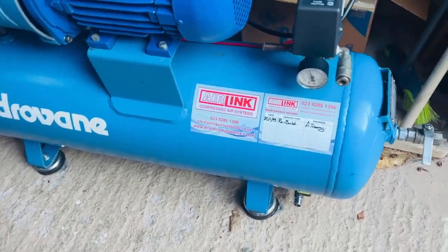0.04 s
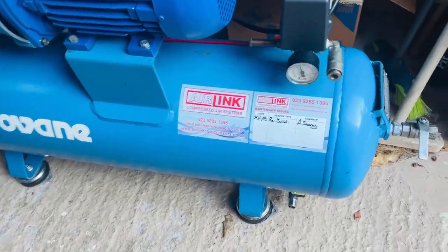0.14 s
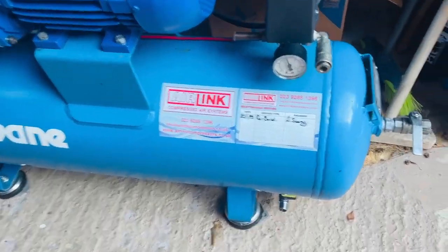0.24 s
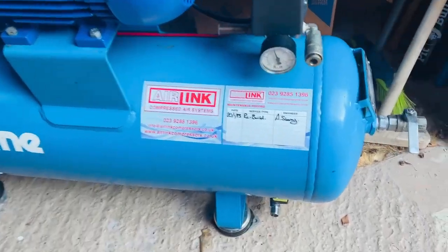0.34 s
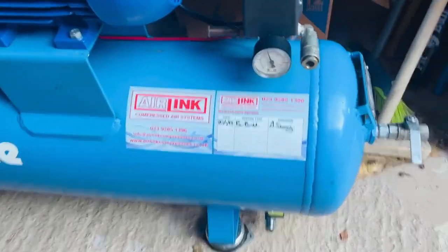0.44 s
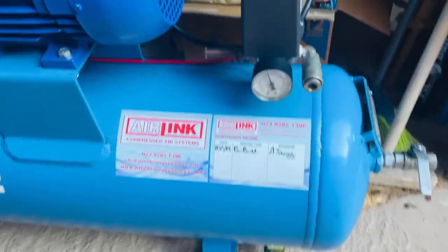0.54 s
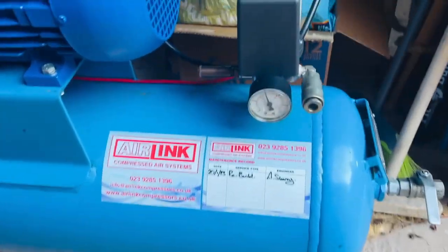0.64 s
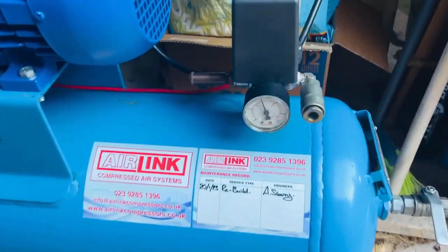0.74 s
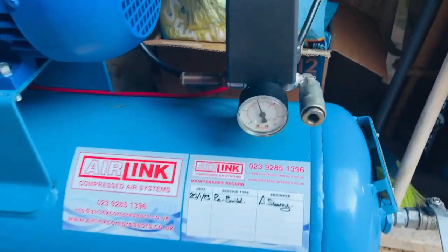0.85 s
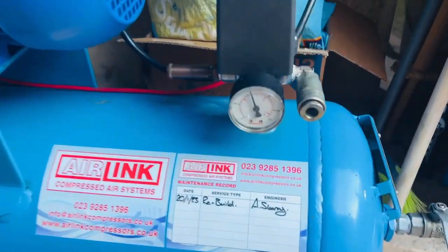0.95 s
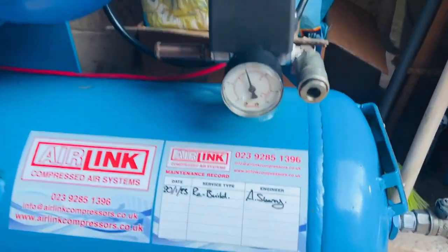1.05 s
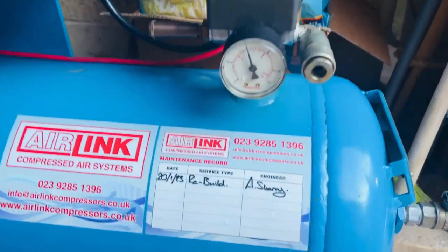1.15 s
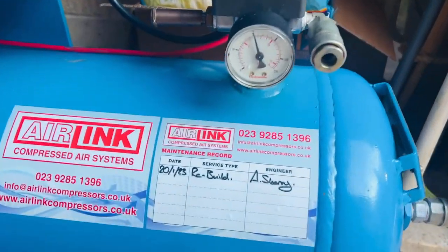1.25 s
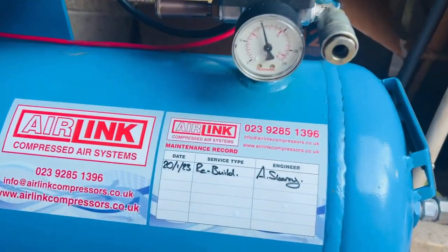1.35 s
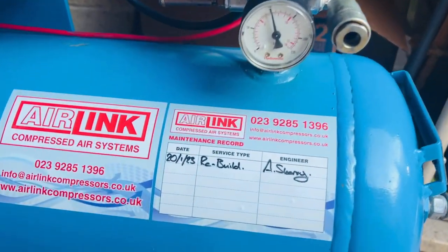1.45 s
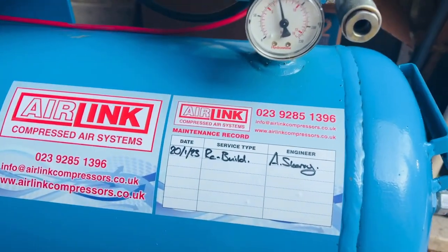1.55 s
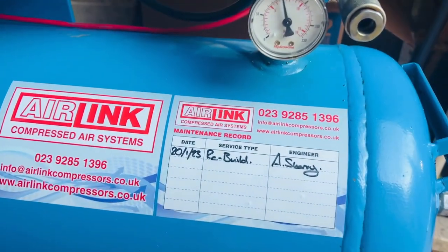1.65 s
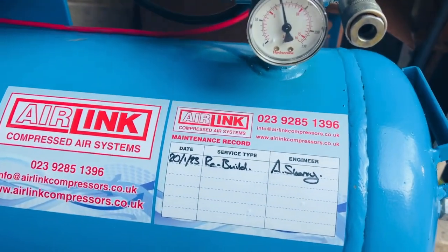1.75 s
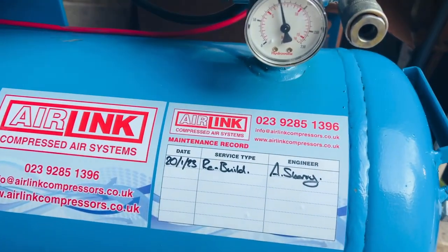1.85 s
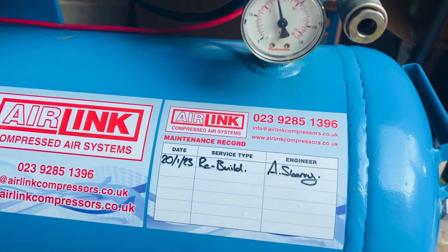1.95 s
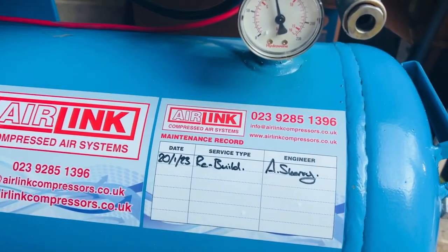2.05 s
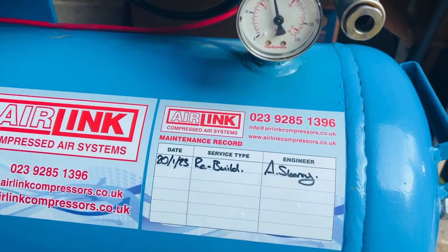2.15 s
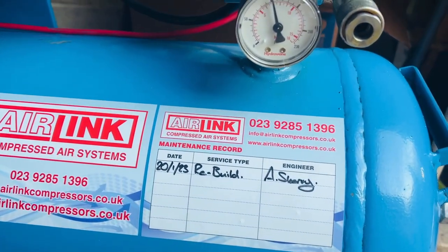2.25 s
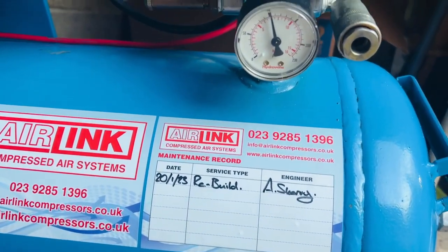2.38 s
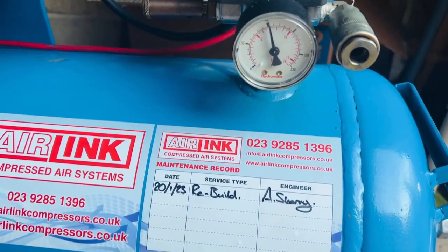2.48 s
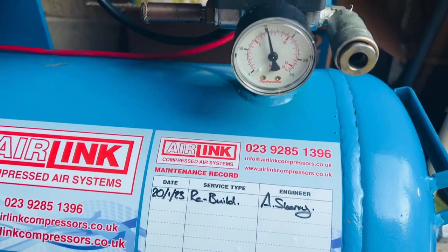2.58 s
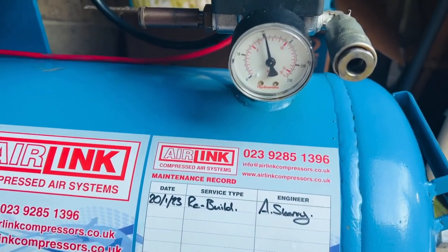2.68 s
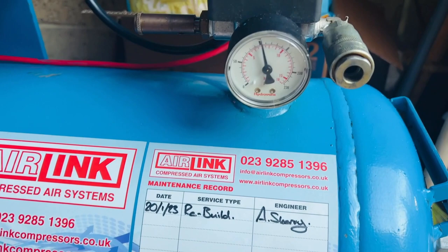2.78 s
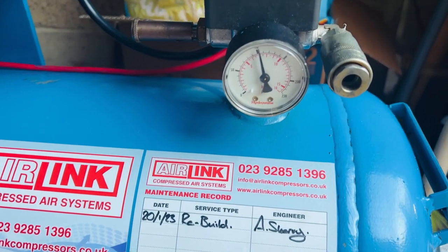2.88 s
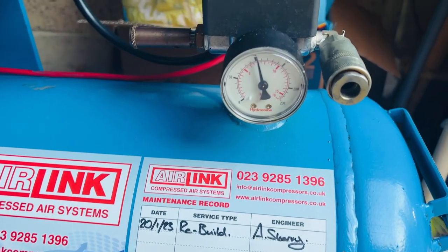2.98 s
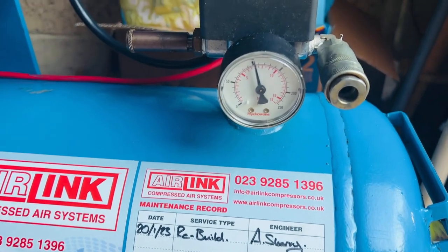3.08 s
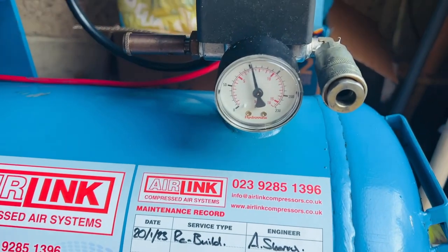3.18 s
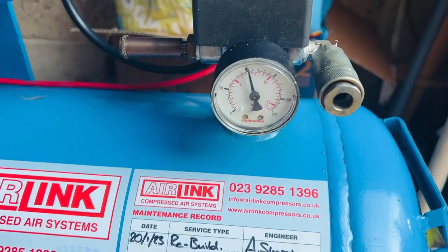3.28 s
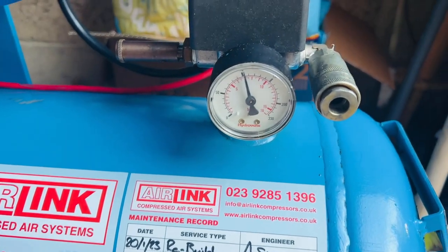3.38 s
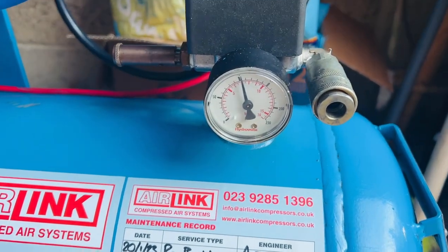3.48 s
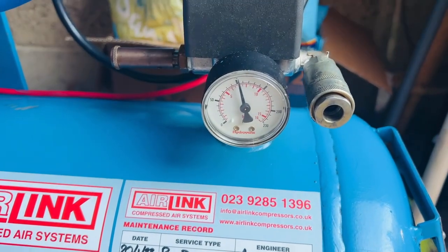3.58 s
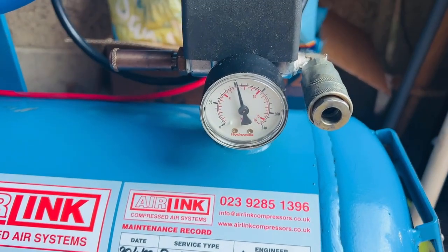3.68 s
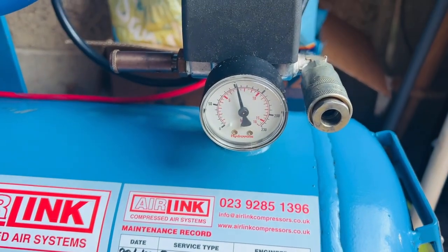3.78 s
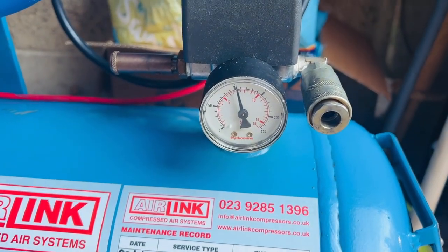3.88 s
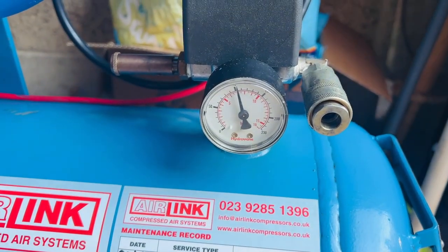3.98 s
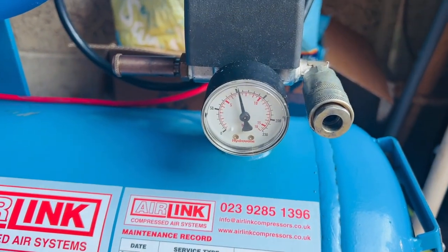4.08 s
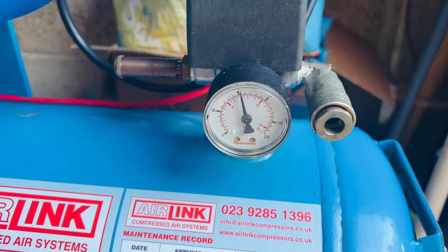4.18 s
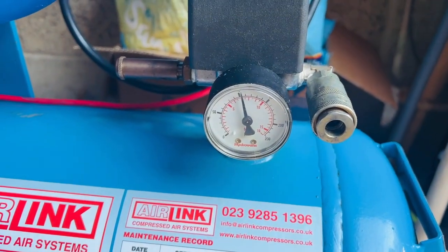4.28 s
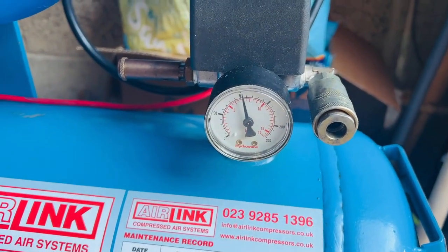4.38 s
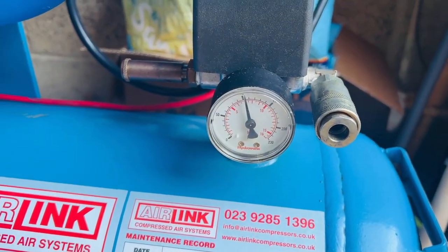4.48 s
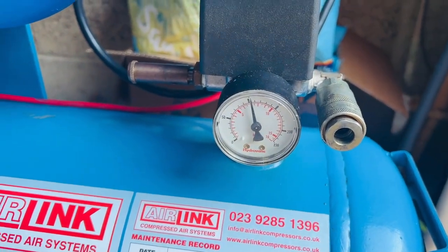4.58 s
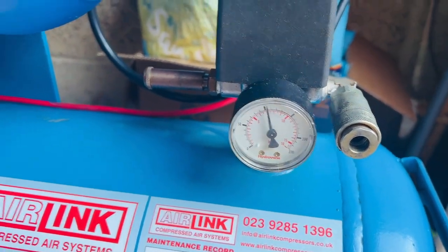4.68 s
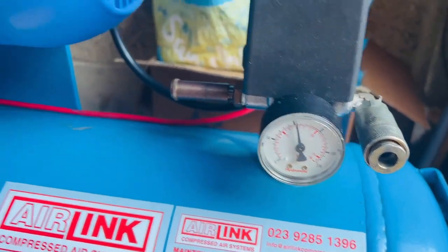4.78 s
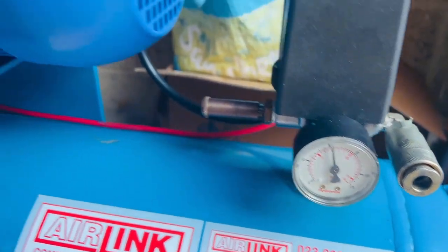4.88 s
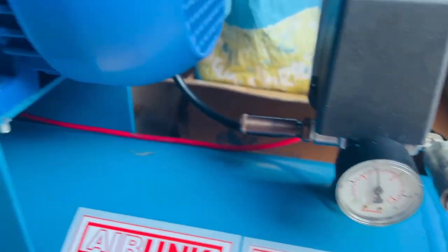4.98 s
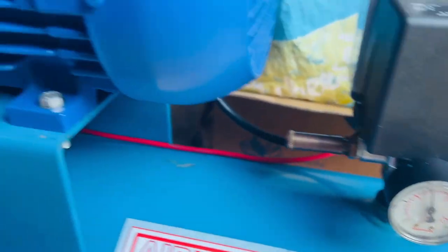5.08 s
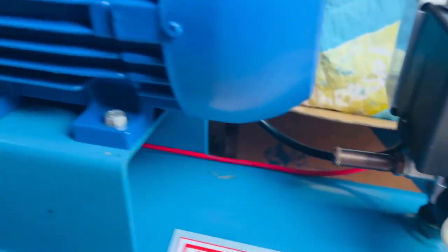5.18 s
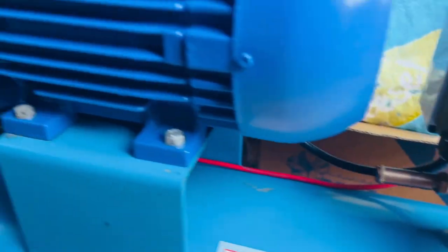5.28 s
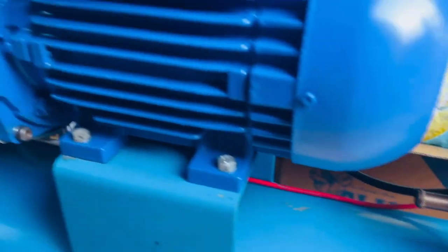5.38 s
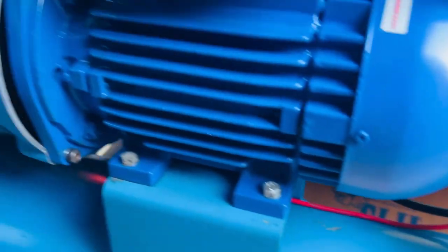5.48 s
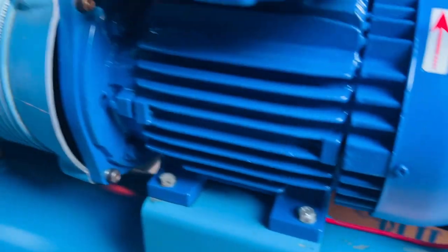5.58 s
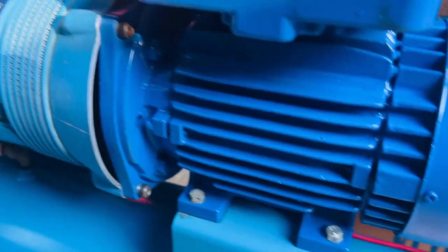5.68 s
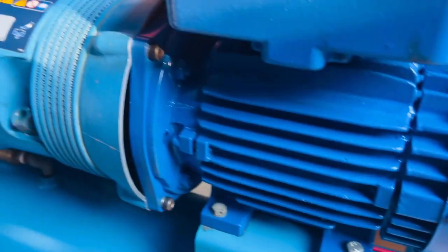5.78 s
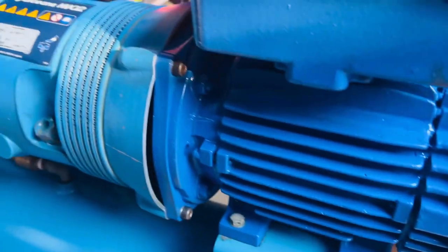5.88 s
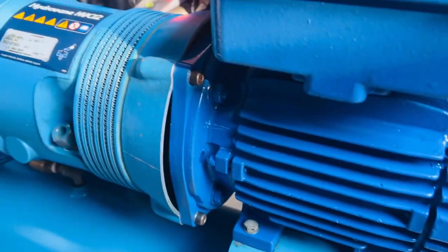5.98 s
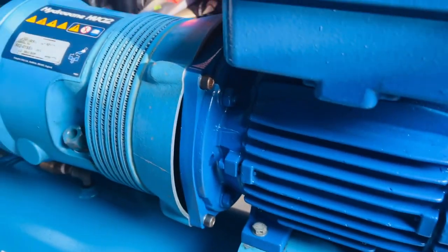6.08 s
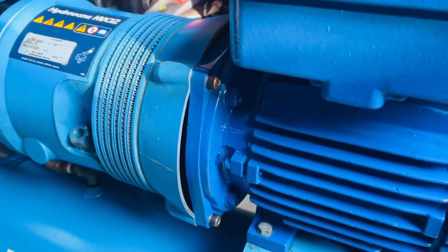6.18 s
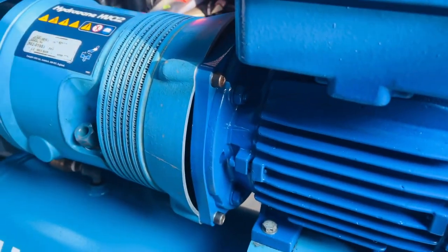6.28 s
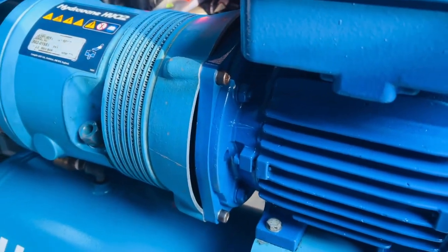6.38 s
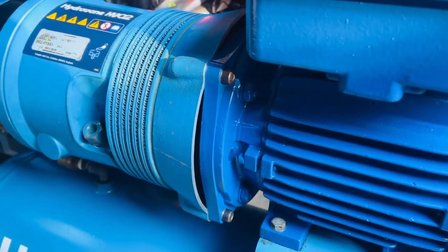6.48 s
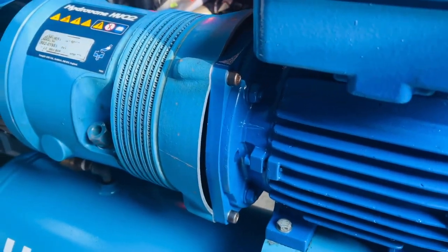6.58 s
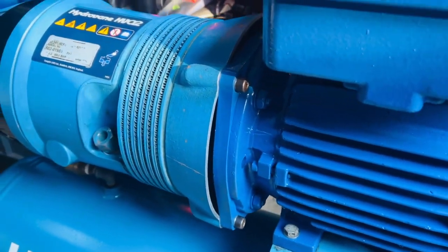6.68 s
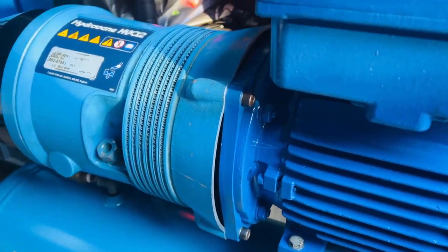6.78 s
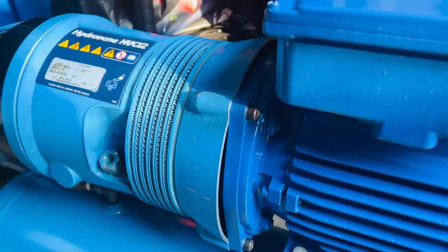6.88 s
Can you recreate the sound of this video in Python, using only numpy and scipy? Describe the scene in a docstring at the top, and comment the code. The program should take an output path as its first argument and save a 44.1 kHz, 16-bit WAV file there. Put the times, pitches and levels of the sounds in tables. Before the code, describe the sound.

Steady electric motor hum and rushing roar of a running compressor, heard close while moving, with buffeting wind bursts near the end.

```python
"""A rotary vane air compressor runs steadily in an open workshop, heard by a hand-held stereo microphone.
From a step back it swings past the fan cowl, whose air rings, and moves in to the tank amid faint gusts.
Past five seconds it swings by the cowl again, passes the motor and ends at the air end, as the fan's
draught rumbles and eddies thud and slap. Throughout, shaped noise gives roar, whirr and hiss, and
fluttering sines give the tones of vanes, shaft, slots and mains."""
import sys
import numpy as np
from scipy import signal
from scipy.fft import rfft, irfft, next_fast_len
from scipy.io import wavfile

SR = 44100
rng = np.random.default_rng(int(sys.argv[2]) if len(sys.argv) > 2 else 0)


def put_to_file(sound):
    """Save the sound as 16-bit audio at rate SR, in the file named by the first command-line argument."""
    columns = np.atleast_2d(sound).T  # one column per channel
    safe = np.clip(columns, -1, 1)
    whole_steps = np.round(safe * 32767)
    wavfile.write(sys.argv[1], SR, whole_steps.astype(np.int16))


N = 306054

SHAFT_HZ, MAINS_HZ, SLOT_HZ = 48.868, 50.0, 1079.6

# The walk. Each row: time in seconds, way from tank to air end (0-1), roar, whirr and hiss gain in dB,
# turn to the left in dB between the ears.
WALK = [(0, 0.59, -5, 2, -1.5, -1), (.4, 0.51, -4, -1, -1, -0.5), (.9, 0.35, -1, -1.5, 1.5, -0.5),
        (2.0, 0.21, -1, -2, 1, -0.5), (3.0, 0.24, -1, -2, 1, -0.5), (4.0, 0.11, -0.5, -3, 0.5, -1),
        (4.6, 0.08, -2.5, -3, 0.5, 0), (4.9, 0.43, -1.5, 1.5, 1.5, -0.5), (5.15, 0.61, 0.5, 0, 1, -0.5),
        (5.4, 0.5, 1, 2, 2, -1), (5.65, 0.74, -2, 2.5, 1.5, 0), (6.0, 0.69, -2, 0.5, 0.5, -0.5),
        (6.5, 0.71, -1.5, -1, 0.5, -0.5), (6.94, 0.75, -4, 2, 0, 0)]
# Time at each of the nine tone places, in walking order. Each row: arrival and departure in seconds.
STOPS = [(0, .55), (.75, 1.0), (1.4, 2.2), (2.75, 4.4), (4.65, 4.85), (5.05, 5.15), (5.4, 5.6), (5.9, 6.55),
         (6.85, 6.94)]

# Gusts of the fan's draught on the microphone. Each row: start in seconds, hold in seconds, level in dB.
GUSTS = [(2.385, 0.049, -35), (2.606, 0.089, -35), (3.53, 0.079, -36), (3.75, 0.13, -41),
         (3.9, 0.26, -31.5), (4.216, 0.12, -35), (4.415, 0.12, -37), (4.628, 0.053, -31),
         (5.032, 0.073, -32), (5.345, 0.01, -18), (5.385, 0.2, -18), (5.645, 0.08, -22),
         (5.795, 0.045, -18), (5.855, 0.11, -18), (6.1, .03, -37), (6.32, 0.05, -31), (6.54, 0.02, -30),
         (6.78, 0.03, -31)]
# Eddies striking the microphone, low thuds and higher slaps. Each row: time in seconds,
# nominal peak in dB, nominal pitch in Hz.
BUFFETS = [(3.754, -21, 109), (3.947, -22, 68), (5.066, -18, 104), (5.152, -24, 106), (5.341, -11.5, 90),
           (5.35, -9, 333), (5.392, -6.5, 252), (5.412, -6, 112), (5.422, -7, 253), (5.448, -7, 265),
           (5.455, -5, 125), (5.467, -15, 347), (5.478, -10, 60), (5.492, -14, 180), (5.522, -11, 100),
           (5.512, -9.5, 334), (5.544, -9, 106), (5.544, -9, 278), (5.591, -16, 266), (5.593, -6, 95),
           (5.645, -11, 320), (5.657, -8, 85.5), (5.695, -13, 267), (5.702, -6.5, 95), (5.673, -15, 70),
           (5.73, -15, 70), (5.755, -16, 55), (5.784, -19, 200), (5.789, -4, 125), (5.829, -17, 75),
           (5.802, -10.5, 217), (5.813, -5.5, 89), (5.861, -9, 268), (5.877, -8, 81), (5.904, -14, 95),
           (5.947, -19, 65), (5.891, -22, 345), (5.928, -4.5, 390), (5.93, -8, 140), (5.966, -3.5, 250),
           (5.976, -16, 112), (6.092, -9, 344), (6.102, -14, 100), (6.162, -12, 340), (6.184, -11.5, 406),
           (6.229, -10, 348), (6.206, -26, 65), (6.243, -17, 79.5), (6.294, -20, 80), (6.328, -18, 160),
           (6.546, -21, 65), (6.786, -23, 70), (6.293, -12, 380), (6.339, -12, 345), (6.351, -19, 129),
           (6.604, -12, 430), (6.618, -23, 85), (6.36, -20, 60), (6.809, -12, 340), (6.813, -18, 150),
           (6.48, -14, 400), (6.532, -20, 300), (6.77, -14.5, 424), (6.872, -18, 387), (5.435, -6.5, 200),
           (5.532, -11, 297), (6.919, -10.5, 393)]

# Air ringing in the fan cowl. Each row: pitch in Hz, width in Hz, level from afar in dB,
# lingering as a multiple of the retreat time.
COWL_RINGS = [(1444, 80, -47, 0.59), (2053, 156, -51.5, 1.46), (2340, 120, -56, 0.18),
              (2640, 120, -62, 0.5)]
# Swings past the cowl's mouth. Each row: nearest moment in seconds, approach and retreat in seconds,
# gain in dB.
COWL_PASSES = [(0.649, 0.11, 0.098, 12.5), (5.1, 0.14, 0.51, 15.5)]

# Roar beside the tank, before the walk's gains. Each row: frequency in Hz, left and right level in
# dB per Hz, likeness of the ears (0-1), left lead in radians.
ROAR_BY_TANK = [(40.0, -67, -76, 0.96, -7), (64.6, -56, -56, 0.98, -4), (112, -50, -53, 1, -3),
                (217, -53.5, -57, 0.94, 3.5), (358, -48, -54.5, 0.96, -0.5), (524, -54, -57.5, 1, 0.7),
                (633, -48.5, -50, 1, 1.36), (930, -52.5, -57, 1, 1.3), (1233, -53, -56, 0.57, 2.5),
                (1274, -56, -64, 0.25, 5.5), (1600, -54.5, -58, 0.44, 1), (1730, -61.5, -62, 0.45, 11),
                (2720, -66.5, -71, 0.43, 3.5), (3200, -69.5, -76, 0.27, -0.5),
                (4500, -72.5, -73, 0.74, 1.46), (5620, -71, -84, 0.46, -2.5)]
# Roar beside the air end. Each row: frequency in Hz, left and right level in dB per Hz,
# likeness of the ears (0-1), left lead in radians.
ROAR_BY_AIR_END = [(40.0, -63, -63, 0.99, -9), (65.0, -57, -55.5, 0.99, -2), (102, -52.5, -55, 1, -1.5),
                   (199, -52.5, -51.5, 0.96, -0.5), (373, -48, -46.5, 1, -1.3), (544, -49, -52, 0.99, -0.3),
                   (764, -52.5, -46, 0.34, -1.3), (1016, -58.5, -60, 0.97, -1.3),
                   (1087, -52, -50, 0.96, -0.5), (1260, -68.5, -60, 0.8, 1.5), (1570, -74, -61, 0.24, -1.5),
                   (1780, -71, -66.5, 0.3, -16), (2370, -69, -69.5, 0.23, 1), (3200, -82.5, -72.5, 0.67, 3),
                   (4100, -73.5, -75.5, 0.84, 1.5), (5540, -72.5, -75.5, 0.22, 1.5)]
# Top of the hiss: level, likeness and phase between left and right by frequency. Each row: frequency
# in Hz, level by tank and by air end in dB per Hz, likeness (0-1), left lead in half turns.
TREBLE = [(7000, -80.5, -82.5, .55, 0), (8300, -79, -81, .65, -.4), (9000, -80.5, -84, .8, -.7),
          (9600, -81.5, -85, .99, -1), (10600, -82.5, -86, .99, -1), (11200, -84, -87.5, .85, -1.2),
          (11900, -88, -92, .95, -2), (13500, -87.5, -91.5, .99, -2), (14900, -90, -93, .95, -2),
          (15600, -90.5, -92.5, .7, -2.8)]
# Narrow and broad boosts and cuts that colour the roar. Each row: centre in Hz, width in Hz,
# boost by tank and by air end in dB.
ROAR_COLOURS = [(698, 32, 6, -1.5), (775, 30, -3, 0), (810, 30, -2, 2.5), (1195, 45, 4.5, 3),
                (1310, 90, 0, 0.5), (1453, 73, 5, 1.5), (2030, 40, 5, -5), (2650, 19, 8, 2),
                (2750, 96, 0, 7.5), (2950, 39, 5.5, -2), (3203, 110, 7.5, 3), (3500, 420, 3, -2.5),
                (3970, 46, 6, 6), (4200, 300, -2.5, 4), (4680, 87, 4.5, -14), (5620, 200, 0, -12)]

# Faint shaft tones. Each row: multiple of the shaft rate, level in dB, left over right in dB,
# change at the air end in dB.
SHAFT_ORDERS = [(7, -41, 2, 0), (18, -43.5, 3, 0), (21, -48, 3, 0), (25, -47, 3, 0), (64, -60, 3, 0),
                (70, -58, 5, -9), (72, -59, 3, -5), (80, -59, 3, 0), (88, -66, 3, 0), (96, -64, 3, 0),
                (114, -66, 3, 0), (168, -68, 1, 0)]
# Magnetic hum. Each row: multiple of the mains rate, level in dB, left over right in dB,
# change at the air end in dB.
MAINS_ORDERS = [(2, -35.5, 1, -9), (10, -41.5, 14.5, -6.5), (12, -40.5, 7, -10)]
# Strong tones: vane passing and overtones, shaft orders, slot whine. Each entry: multiple of shaft rate.
STRONG_ORDERS = [8, 16, 24, 32, 48, 56, 9, 10, SLOT_HZ / SHAFT_HZ, 30, 40]
# Strong tones from a step back. Each row, one a tone: left and right level in dB, left lead in radians.
TONES_STANDING_BACK = [(-24.5, -27.5, 0.7), (-24.0, -31.5, 1.5), (-44.5, -44.0, 2.4), (-40.0, -38.0, 1.7),
                       (-51.0, -48.0, 2.0), (-57.0, -51.5, 2.5), (-40.0, -38.5, 0.0), (-47.5, -42.5, 0.8),
                       (-44.5, -46.0, 2.5), (-56.0, -52.0, -1.0), (-45.0, -56.0, 1.6)]
# Stepping in. Each row, one a tone: left and right level in dB, left lead in radians.
TONES_STEPPING_IN = [(-25.0, -29.0, 0.8), (-26.0, -37.0, 1.7), (-43.0, -42.5, 2.1), (-38.5, -38.5, 0.8),
                     (-44.5, -43.5, 3.7), (-49.5, -52.5, 2.6), (-36.0, -35.5, 0.2), (-37.0, -45.5, 0.6),
                     (-44.0, -50.0, 1.0), (-54.0, -41.5, -1.0), (-53.0, -50.0, 1.3)]
# Beside the tank. Each row, one a tone: left and right level in dB, left lead in radians.
TONES_BY_TANK = [(-27.0, -30.5, 1.1), (-28.0, -41.5, 2.4), (-36.0, -53.0, 4.9), (-35.0, -37.5, 1.5),
                 (-55.0, -46.0, 1.4), (-60, -53.0, 3.5), (-33.0, -34.5, 0.3), (-33.0, -40.5, -0.1),
                 (-35.5, -39.5, 0.8), (-43.0, -50.5, -3.1), (-51.0, -47.5, -0.7)]
# Beside the gauge. Each row, one a tone: left and right level in dB, left lead in radians.
TONES_BY_GAUGE = [(-28.0, -31.0, 1.3), (-29.0, -42.0, 2.3), (-34.5, -53.5, 6.1), (-33.0, -42.0, 1.1),
                  (-42.0, -43.5, 3.0), (-44.5, -46.5, 4.2), (-33.0, -35.0, 0.3), (-35.0, -46.0, 0.1),
                  (-38.5, -42.0, 1.1), (-46.5, -44.0, -2.7), (-50.5, -55.0, -1.5)]
# Turning away. Each row, one a tone: left and right level in dB, left lead in radians.
TONES_TURNING_AWAY = [(-27.0, -30.0, 1.3), (-27.0, -39.5, 1.9), (-34.0, -43.0, 6.5), (-31.5, -32.5, 1.5),
                      (-42.0, -42.0, 2.6), (-48.0, -47.5, 4.5), (-33.0, -35.5, 0.4), (-36.0, -44.0, -0.1),
                      (-39.0, -41.5, 1.3), (-51.0, -40.0, -2.3), (-55.0, -60, -4.0)]
# Beside the cowl. Each row, one a tone: left and right level in dB, left lead in radians.
TONES_BY_COWL = [(-24.0, -28.5, 0.9), (-23.0, -38.0, 0.8), (-35.0, -40.0, 6.8), (-32.5, -32.0, 2.1),
                 (-49.5, -48.0, 2.0), (-49.0, -50.5, 2.5), (-32.5, -34.0, 0.2), (-34.0, -37.5, 0.4),
                 (-42.0, -49.0, 2.5), (-42.0, -43.5, -0.2), (-60, -58.0, -1.7)]
# Beside the motor. Each row, one a tone: left and right level in dB, left lead in radians.
TONES_BY_MOTOR = [(-21.0, -25.5, 0.3), (-25.5, -28.0, 0.8), (-36.0, -42.0, 6.2), (-50.0, -38.5, 3.9),
                  (-49.0, -48.0, -1.0), (-53.0, -52.0, 2.2), (-36.0, -50.0, 0.3), (-43.5, -46.0, -0.2),
                  (-34.0, -51.0, 5.8), (-44.0, -47.0, -1.4), (-60, -56.0, -1.1)]
# Beside the air end. Each row, one a tone: left and right level in dB, left lead in radians.
TONES_BY_AIR_END = [(-22.5, -25.0, 0.3), (-31.0, -28.0, 0.8), (-35.0, -36.5, 6.4), (-47.0, -54.0, 6.9),
                    (-50.0, -47.5, -3.1), (-51.0, -48.5, 1.7), (-35.0, -41.0, -0.4), (-38.0, -44.0, 0.1),
                    (-34.0, -42.0, 5.7), (-43.0, -46.0, -2.0), (-53.0, -60, -0.1)]
# Over the air end. Each row, one a tone: left and right level in dB, left lead in radians.
TONES_OVER_AIR_END = [(-20.5, -22.5, 0.3), (-36.0, -36.0, 1.1), (-44.0, -39.0, 6.7), (-42.0, -48.0, 6.6),
                      (-51.0, -53.0, -4.5), (-48.5, -48.5, 1.9), (-33.5, -40.0, -0.3), (-35.5, -40.5, -0.2),
                      (-31.5, -34.5, 6.0), (-42.0, -38.0, -0.9), (-53.0, -60, -0.1)]

GUST_RISE_DB_PER_S, GUST_FALL_DB_PER_S, CALM_DB = 800, 450, -46
# upper band against the gust level at -19 dB; dB more per dB of gust
TEAR_DB, TEAR_GROWS = -4.5, 0.11
LUMPS_DB = 3.5
THUD_MS, SHORTER_POWER = 13.6, 0.57   # length scale at 100 Hz; higher buffets are shorter
EDDY_SKEW = 0.25   # range, in turns, by which an eddy's crest may shift
COWL_SAG_PER_S = 0.07   # share of pitch lost per second as the microphone goes by
ROAR_TOP_HZ, HISS_FROM_HZ = 1000, 3100
# the motor body shades the upper whirr
SHADE_HZ, SHADE_WIDTH_HZ, SHADE_SHARE = 2850, 670, 0.28
SHADE_START_S, SHADE_END_S, SHADE_RAMP_S = 5.55, 6.3, 0.083
SLOT_LOWER_DB = -43   # the slot whine's partner, twice the mains rate below
MOTOR_WAY, AIR_END_WAY = 0.52, 0.62   # where along the way the faint tones change
FLUTTER_DB, FLUTTER_HZ = 0.8, 7.4   # turbulence shakes the tones
# slow swell per ear: dB for each dB that a tone lies under the still level
STANDING_DB, STANDING_HZ, STILL_ABOVE_DB = 0.085, 2.0, -17
MIC_LOW_HZ, CUTOFF_HZ = 41.7, 15730


def from_db(db):
    """Decibels to gain."""
    return 10 ** (np.asarray(db) / 20)


def rms_one(x):
    """Scale to unit rms."""
    return x / np.sqrt(np.mean(x ** 2) + 1e-20)


def in_time(rows):
    """Columns of a curve table, one value a sample."""
    s, *columns = np.transpose(rows)
    return [np.interp(np.arange(N) / SR, s, column) for column in columns]


def drift(rate_hz):
    """Chance wandering of spread 1: noise through a two-pole lowpass, one point each 40 samples."""
    pole = np.exp(-80 * np.pi * rate_hz / SR)
    noise = rng.standard_normal(N // 40 + 2002)
    slow = signal.lfilter([1], [1, -2 * pole, pole * pole], noise)[2000:]   # drop the settling
    return np.interp(np.arange(N) / 40, np.arange(len(slow)), rms_one(slow))


def gusts_db():
    """Each gust rises fast, holds and dies away; the loudest one rules."""
    t, level_db = np.arange(N) / SR, CALM_DB
    for s, hold, db in GUSTS:
        early, late = np.maximum(s - t, 0), np.maximum(t - s - hold, 0)
        gust_db = db - GUST_RISE_DB_PER_S * early - GUST_FALL_DB_PER_S * late
        level_db = np.maximum(level_db, gust_db)
    return level_db


def draught():
    """Lumpy low noise, almost alike at both ports; hard gusts tear and reach higher."""
    level_db = gusts_db()
    torn_db = level_db + TEAR_DB + TEAR_GROWS * (level_db + 19)
    out = 0
    for low_hz, high_hz, db in ((34.2, 86, level_db - 2.5), (147, 440, torn_db)):
        band = signal.butter(2, [low_hz, high_hz], "band", fs=SR, output="sos")
        mid, side = signal.sosfilt(band, rng.standard_normal((2, N + SR)))[:, SR:]
        lumps = from_db(db + LUMPS_DB * drift(26))
        out = out + lumps * (mid + from_db(-12) * side * [[1], [-1]]) / np.std(mid)
    return out


def buffets():
    """Each eddy is a short pressure wobble: it strikes fast, slows down and frays as it passes."""
    out, t = np.zeros((2, N)), np.arange(N) / SR
    chance = rng.random((len(BUFFETS), 3))
    fray = from_db(1.3 * drift(60))
    for (s, db, hz), (start, pan, push) in zip(BUFFETS, chance):
        spread = THUD_MS * (100 / hz) ** SHORTER_POWER / 1000 * 0.55   # seconds
        near = slice(max(0, int((s - 4 * spread) * SR)), int((s + 5 * spread) * SR))
        u = t[near] - s
        sign = np.sign(push - 0.5)   # a push or a pull
        cycles = hz * u * (1.12 - 0.2 * u / spread)   # the pitch falls
        turn = 2 * np.pi * (cycles + 0.26 + EDDY_SKEW * (start - 0.5))
        shape = np.exp(-0.5 * (u / (spread * np.where(u < 0, 0.55, 1.25))) ** 2)
        wobble = np.sin(turn) + 0.32 * shape * np.sin(2 * turn)   # the steep front adds an overtone
        ears = from_db(2.0 * pan * np.array([[1], [-1]]))
        out[:, near] += from_db(db) * shape * wobble * sign * ears
    return out * fray


def cowl():
    """Turbulence rings the cowl's air spaces: narrow noise, partly alike at both ears."""
    out, t = 0, np.arange(N) / SR
    # seconds before (negative) or after each pass, counted only within 1.5 s of it
    sag = sum(np.clip(t - s, -come, go) * (abs(t - s) < 1.5) for s, come, go, db in COWL_PASSES)
    for hz, width, far_db, lingers in COWL_RINGS:
        near_db = sum(db * np.exp(-0.5 * ((t - s) / np.where(t < s, come, go * lingers)) ** 2)
                      for s, come, go, db in COWL_PASSES)
        turn = 2 * np.pi * np.cumsum(hz * (1 - COWL_SAG_PER_S * sag)) / SR
        lowpass = signal.butter(2, width / 2, fs=SR, output="sos")
        slow = signal.sosfilt(lowpass, rng.standard_normal((2, 2, N)))
        mid, side = slow[0] * np.cos(turn) + slow[1] * np.sin(turn)
        ringing = rms_one(mid + 0.35 * side * [[1], [-1]])
        out = out + from_db(far_db + near_db + 1.0 * drift(3.5)) * ringing
    return out


def roar_at(place, colours, shared, apart, hz):
    """Stereo spectrum of the roar: the right ear hears part of the left's noise, later, and some its own."""
    at, *columns = np.transpose(place)
    left_db, right_db, alike, lead = (np.interp(np.log(hz), np.log(at), c) for c in columns)
    boost_db = sum(db / (1 + (2 * (hz - centre) / width) ** 2) for centre, width, db in colours)
    alike = np.clip(alike, 0, 1)
    lead = np.clip(lead, -hz / 350, hz / 350)   # close ports cannot part long waves
    right = alike * shared * np.exp(-1j * lead) + np.sqrt(1 - alike ** 2) * apart
    ears = np.array([from_db(left_db) * shared, from_db(right_db) * right])
    return ears * from_db(boost_db) * np.sqrt(SR / 2)


def roar():
    """Housing roar, fan whirr and air hiss: shaped noise blended from one place into the other."""
    way, roar_db, whirr_db, hiss_db, turn_db = in_time(WALK)
    size = next_fast_len(N)
    hz = np.arange(size // 2 + 1) * SR / size + 1e-3
    shared, apart = rfft(rng.standard_normal((2, size)))
    low = 1 / (1 + (hz / ROAR_TOP_HZ) ** 4)
    high = 1 / (1 + (HISS_FROM_HZ / hz) ** 4)
    layers = [(low, roar_db + 0.8 * drift(10)),
              (1 - low - high, whirr_db + 0.3 * drift(9)),
              (high, hiss_db + 0.25 * drift(10))]
    tank_top = [(f, tank, tank, alike, np.pi * lead) for f, tank, end, alike, lead in TREBLE]
    end_top = [(f, end, end, alike, np.pi * lead) for f, tank, end, alike, lead in TREBLE]
    tank_colours = [(f, width, tank) for f, width, tank, end in ROAR_COLOURS]
    end_colours = [(f, width, end) for f, width, tank, end in ROAR_COLOURS]
    way, out = np.clip(way, 0, 1), 0
    for place, colours, share in ((list(ROAR_BY_TANK) + tank_top, tank_colours, 1 - way),
                                  (list(ROAR_BY_AIR_END) + end_top, end_colours, way)):
        spectrum = roar_at(place, colours, shared, apart, hz)
        heard = sum(from_db(db) * irfft(spectrum * band, size)[:, :N] for band, db in layers)
        out = out + share * heard
    return out * from_db(np.array([turn_db, -turn_db]) / 2)


def shaded(x):
    """A band of the roar dims while the motor stands in the way."""
    edges = [SHADE_HZ - SHADE_WIDTH_HZ / 2, SHADE_HZ + SHADE_WIDTH_HZ / 2]
    band = signal.butter(1, edges, "band", fs=SR, output="sos")
    corners = [SHADE_START_S - SHADE_RAMP_S, SHADE_START_S, SHADE_END_S, SHADE_END_S + SHADE_RAMP_S]
    shade = np.interp(np.arange(N) / SR, corners, [0, 1, 1, 0])
    return x - SHADE_SHARE * shade * signal.sosfilt(band, x)


def tone(hz, left_db, right_db, lead):
    """A fluttering sine at both ears, rms levels in dB before the flutter, left lead in radians."""
    turn = 2 * np.pi * (hz * np.arange(N) / SR + rng.random())
    ears = np.array([from_db(left_db) * np.sin(turn + lead), from_db(right_db) * np.sin(turn)])
    return np.sqrt(2) * from_db(FLUTTER_DB * drift(FLUTTER_HZ)) * ears


def faint_tones():
    """Faint shaft orders, mains hum and the slot whine's lower partner: slowly wavering sines."""
    way, out = in_time(WALK)[0], 0
    toward_end = np.interp(way, [MOTOR_WAY, AIR_END_WAY], [0, 1])
    faint = [(order * SHAFT_HZ, db + end_db * toward_end, pan) for order, db, pan, end_db in SHAFT_ORDERS]
    faint += [(round(order) * MAINS_HZ, db + end_db * toward_end, pan)
              for order, db, pan, end_db in MAINS_ORDERS]
    faint += [(SLOT_HZ - 2 * MAINS_HZ, SLOT_LOWER_DB, 0)]
    for hz, db, pan in faint:
        waver_db = 1.5 * drift(0.6)
        # standing waves shift with the hand
        lead = np.clip(hz / 800, 0, 2) * (1 + 0.6 * drift(0.45))
        out = out + tone(hz, db + pan / 2 + waver_db, db - pan / 2 + waver_db, lead)
    return out


def strong_tones():
    """Vane passing (eight a turn), shaft orders and slot whine: sines that change from stop to stop."""
    t, out = np.arange(N) / SR, 0
    places = [TONES_STANDING_BACK, TONES_STEPPING_IN, TONES_BY_TANK, TONES_BY_GAUGE, TONES_TURNING_AWAY,
              TONES_BY_COWL, TONES_BY_MOTOR, TONES_BY_AIR_END, TONES_OVER_AIR_END]
    for order, *heard in zip(STRONG_ORDERS, *places):
        left_db, right_db, lead = (np.interp(t, np.ravel(STOPS), np.repeat(column, 2))
                                   for column in np.transpose(heard))
        left_db, right_db = (db + STANDING_DB * (STILL_ABOVE_DB - db) * drift(STANDING_HZ)
                             for db in (left_db, right_db))
        out = out + tone(order * SHAFT_HZ, left_db, right_db, lead)
    return out


def scene():
    """The air on the microphone plus the machine."""
    return draught() + buffets() + cowl() + shaded(roar()) + faint_tones() + strong_tones()


def record(dry):
    """The microphone drops the deep bass, peaks are rounded, the top is cut."""
    thin = signal.sosfilt(signal.butter(2, MIC_LOW_HZ, "high", fs=SR, output="sos"), dry)
    rounded = 0.95 * np.tanh(thin / 0.95)
    top = signal.ellip(12, 0.5, 70, CUTOFF_HZ, fs=SR, output="sos")
    return signal.sosfilt(top, rounded)


dry = scene()
out = record(dry)
put_to_file(out)
```